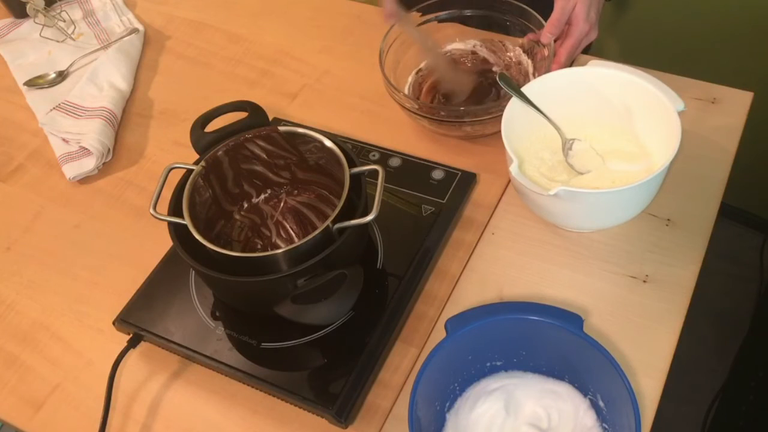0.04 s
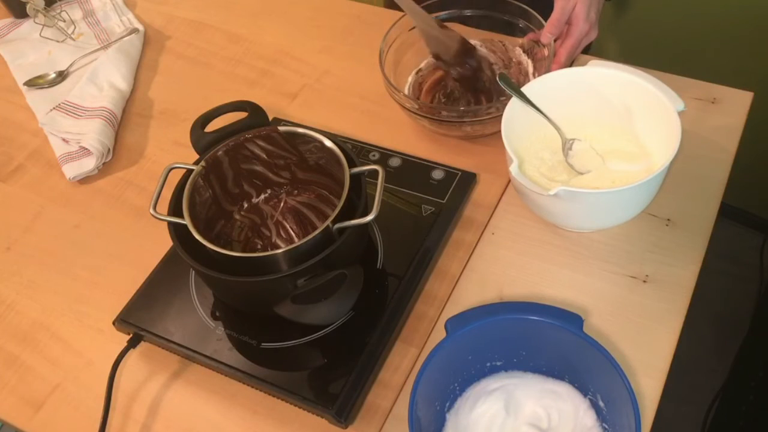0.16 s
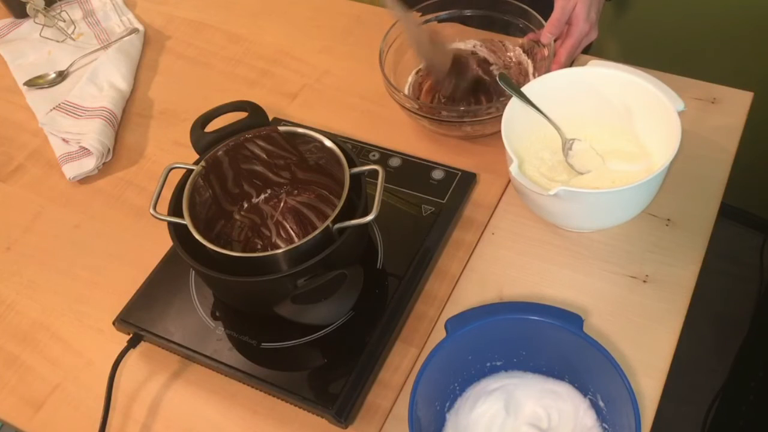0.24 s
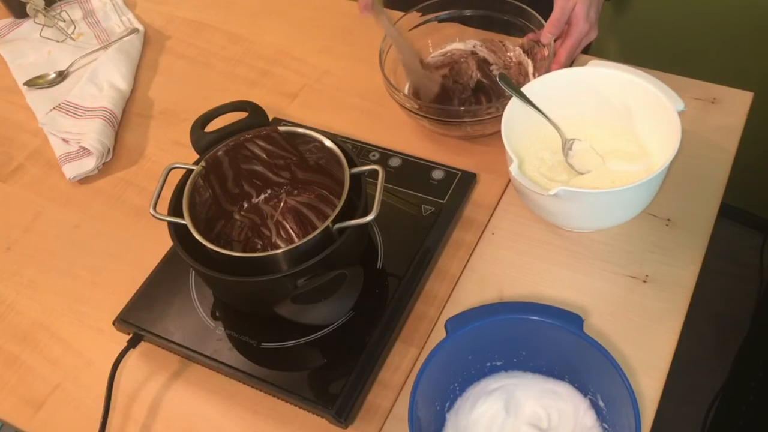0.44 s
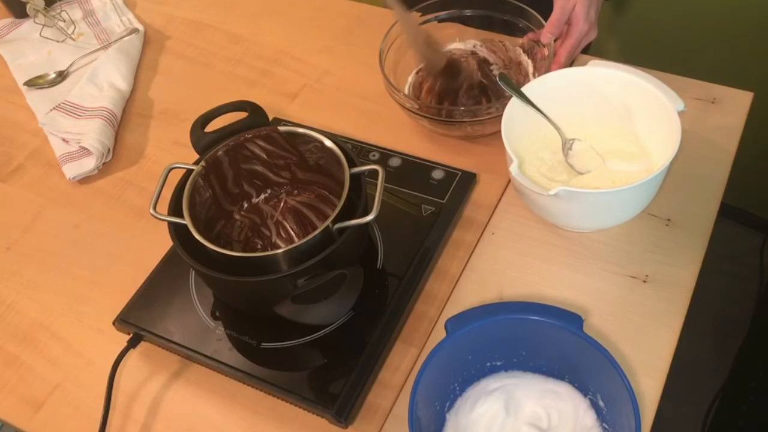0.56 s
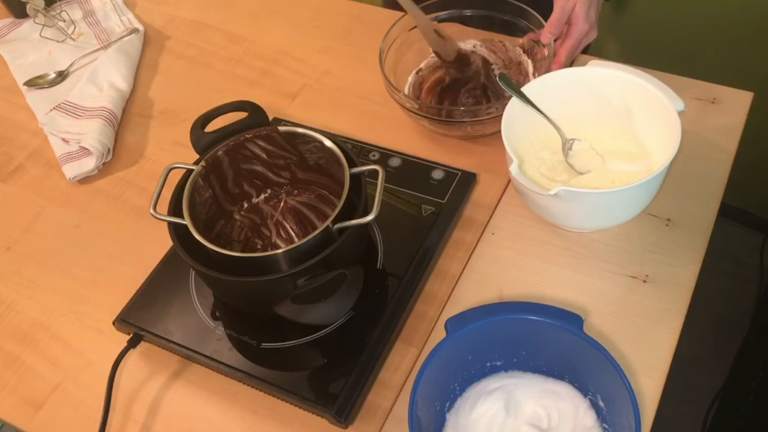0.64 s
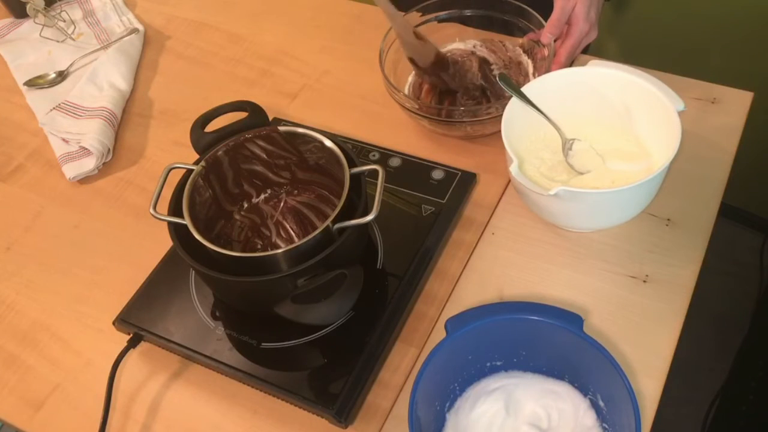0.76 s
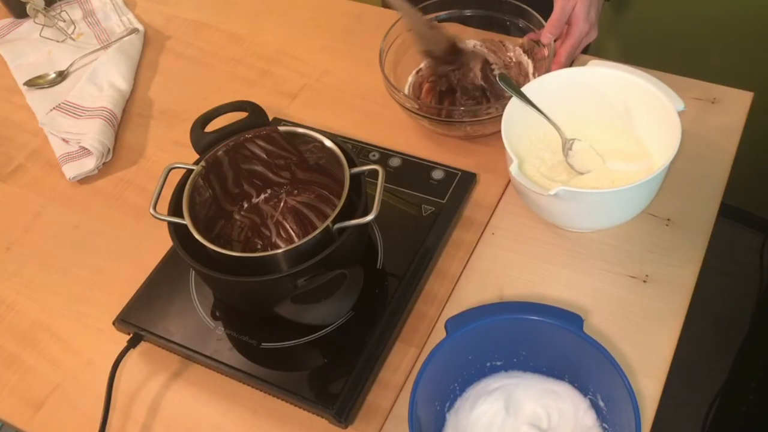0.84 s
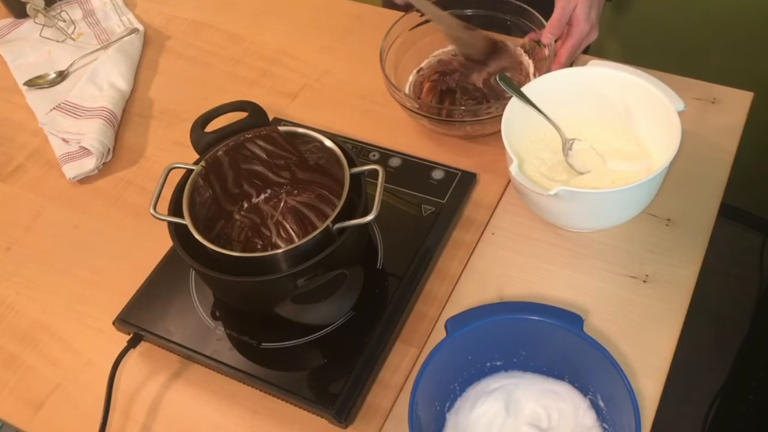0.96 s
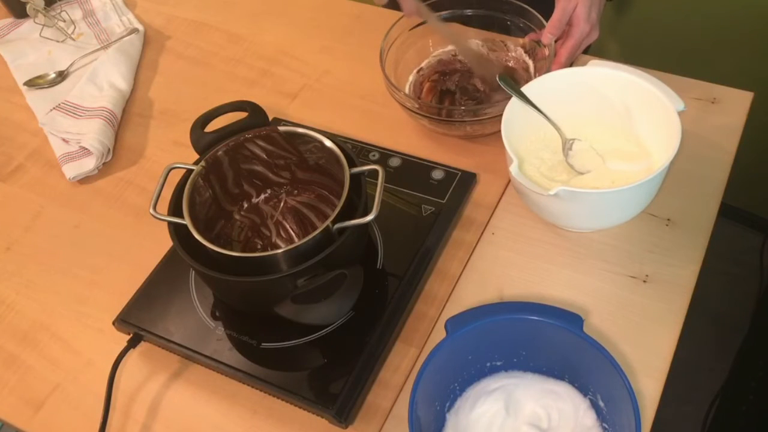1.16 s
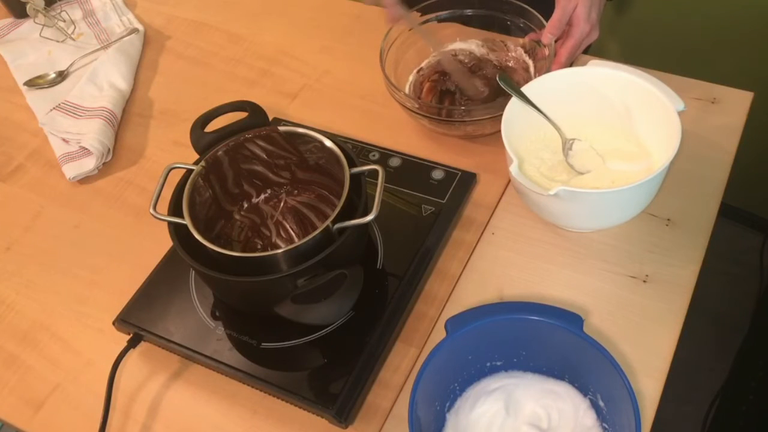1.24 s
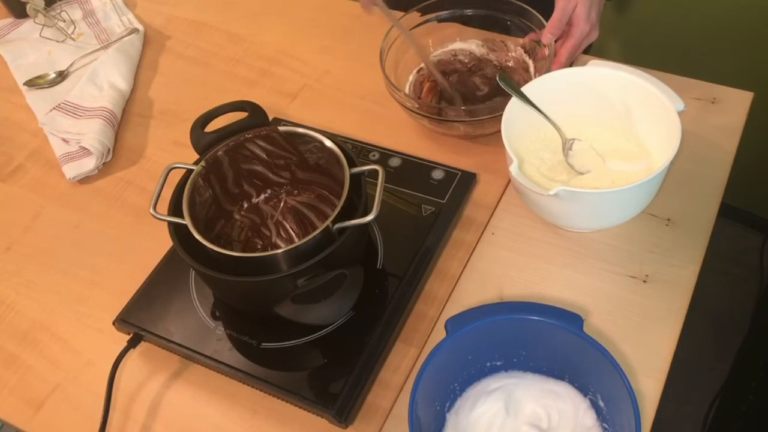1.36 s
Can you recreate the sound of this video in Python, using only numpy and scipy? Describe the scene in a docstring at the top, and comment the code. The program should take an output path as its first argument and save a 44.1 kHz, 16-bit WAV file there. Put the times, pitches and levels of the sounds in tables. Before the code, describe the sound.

A spatula stirs a thick mixture in a glass bowl: a hard knock, a ringing clink, a brief scrape, a light tap and a dull plop. Small wet smacks come between them, over a faint kitchen hum.

```python
"""A spatula works a thick, airy mixture in a glass bowl on a wooden kitchen counter.
Over a small room's rumble and hum, the foam fizzes quietly and smacks as it parts from the glass.
The spatula knocks hard, clinks the bare glass, slides briefly along the wall, taps lightly
and ends on a dull plop. Each blow shakes the counter, rings the bowl and echoes in the kitchen."""
import sys
import numpy as np
from scipy import signal
from scipy.fft import rfft, irfft
from scipy.io import wavfile

SR = 44100
rng = np.random.default_rng(int(sys.argv[2]) if len(sys.argv) > 2 else 0)


def store_pcm(level_fs):
    """Save levels as 16-bit WAV."""
    pcm = np.round(np.clip(level_fs, -1, 1) * 32767).astype(np.int16)
    wavfile.write(sys.argv[1], SR, np.atleast_2d(pcm).T)


N = 61739
T = np.arange(N) / SR

# the wet sparkle of smacks and bubbles: pitch_hz, width_hz, level_db
WET_TREBLE = [(9050, 6000, -7), (12400, 2600, -0.5), (15000, 2000, -9)]


def amp(db):
    """Decibels to gain."""
    return 10 ** (np.asarray(db) / 20)


def unit(x):
    """Scale to rms 1."""
    return x / np.sqrt(np.mean(x ** 2) + 1e-20)


def at_hz(rows, hz, column=1):
    """Read a column of a table on a log-frequency axis."""
    rows = np.array(rows)
    return np.interp(np.log(hz), np.log(rows[:, 0]), rows[:, column])


def delayed(x, start_s):
    """The sound x, starting at start_s."""
    return np.concatenate([np.zeros(max(int(start_s * SR), 0)), x, np.zeros(N)])[:N]


def through(x, response):
    """Pass a sound through an impulse response."""
    return signal.fftconvolve(x, response)[:N]


def damped(resonances):
    """A click through parallel resonances, each applied twice: a brief swell and a fast decay."""
    out = np.zeros(N)
    for k, (hz, width_hz, db) in enumerate(resonances):
        rate = np.pi * width_hz
        envelope = 2 * rate ** 2 / SR * T * np.exp(-rate * T)
        out += (-1) ** k * amp(db) * envelope * np.sin(2 * np.pi * hz * T)
    return out


def ring(modes):
    """Struck modes, each a dying sine."""
    return sum(amp(db - 60 * T / t60_s) * np.sin(2 * np.pi * hz * T) for hz, db, t60_s in modes)


def room_tone():
    """A bed of low rumble, soft hiss, mains hum and the faint whine of an appliance."""
    # colour of the rumble and hiss: frequency_hz, relative_db
    air_spectrum = [(20, 1), (48, 0.5), (78, -10), (105, -13.5), (135, -20), (290, -20.5), (600, -30),
                    (1100, -28), (1700, -25.5), (2800, -28.5), (4200, -36.5), (7000, -39), (15000, -38.5)]
    # steady tones of the mains and the appliance: pitch_hz, level_db
    hum_tones = [(50, -63), (100, -72.5), (1756, -79.5)]
    hz = np.maximum(np.arange(N // 2 + 1) * SR / N, 1)
    air = irfft(rfft(rng.standard_normal(N)) * amp(at_hz(air_spectrum, hz)), N)
    hum = sum(amp(db) * unit(np.sin(2 * np.pi * pitch_hz * T)) for pitch_hz, db in hum_tones)
    return amp(db=-58.5) * unit(air) + hum


def fizz():
    """Tiny bubbles burst at random while the foam is folded."""
    # rise and fall of the fizz: time_s, level_db
    level_curve = [(0, -72.5), (.15, -85), (.33, -73.5), (.5, -77.5), (.62, -74), (.68, -67), (.85, -72),
                   (1.03, -70), (1.15, -79), (1.27, -74.5), (1.39, -69.5)]
    bursts_per_s, spread_db = 2300, 4
    sizes = amp(spread_db * np.minimum(rng.exponential(1, N), 5)) * rng.choice([-1, 1], N)
    bursts = sizes * (rng.random(N) < bursts_per_s / SR)
    envelope = amp(np.interp(T, *np.transpose(level_curve)))
    return envelope * unit(through(bursts, damped(WET_TREBLE)))


def smacks(room):
    """A film of mixture snaps off the glass: a short spray of clicks that rings a small air pocket."""
    # the wet smacks: start_s, treble_db, pocket_db, pocket_hz
    snaps = [(0.0226, -29, -27.5, 4240), (0.1954, -23.5, -22, 4650), (0.2034, -6.5, -25, 4000),
             (0.2048, -11, 2.5, 2180), (0.2096, -11, -9, 4800), (0.3158, -14, -27.5, 4470),
             (0.3201, -22.5, -44, 4300), (.3845, -30.5, -49, 4290), (.3925, -29, -41, 4340),
             (0.543, -34, -34, 4300), (.6406, -14.5, -15, 4380), (0.6446, -26, -27, 4300),
             (.6527, -16, -24, 4020), (0.6929, -46, -26, 2680), (0.7258, -26, -28.5, 3700),
             (.7715, -32.5, -34, 4340), (.8095, -32.5, -41.5, 4300), (.9055, -29.5, -45, 4510),
             (1.0024, -28.5, -49.5, 4300), (1.0498, -24, -30, 3300), (1.0962, -33, -27.5, 4080),
             (1.3172, -26.5, -50, 4370), (1.3439, -42, -22.5, 2800), (1.3725, -24.5, -34.5, 4330),
             (1.393, -29, -48, 4300)]
    spray_samples, spray_decay_s, first_click, pocket_width_hz = 512, 0.00064, .35, 1400
    treble, out = damped(WET_TREBLE), np.zeros(N)
    for start_s, treble_db, pocket_db, pocket_hz in snaps:
        spray = rng.standard_normal(spray_samples) * np.exp(-T[:spray_samples] / spray_decay_s)
        spray = spray / np.linalg.norm(spray) + first_click * signal.unit_impulse(spray_samples)
        colour = amp(treble_db) * treble + damped([(pocket_hz, pocket_width_hz, pocket_db)])
        out += delayed(np.convolve(spray, colour[:spray_samples]), start_s)
    return out + amp(db=3.5) * through(out, room)


def kitchen_echo():
    """The room's impulse response: half-octave bands of noise, each dying at its own rate."""
    # colour and length of the tail: frequency_hz, level_db, t60_s
    tail = [(80, 9, .4), (232, -4.5, 0.39), (600, -6, 0.28), (1150, -7.5, 0.21), (2500, -19, 0.2),
            (5000, -11.5, 0.15), (12000, -18.5, .22)]
    predelay_s, build_s = .003, .004
    hz = np.arange(N // 2 + 1) * SR / N
    white, out = rfft(rng.standard_normal(N)), np.zeros(N)
    edges_hz = 45 * 2 ** (np.arange(18) / 2)
    for low, high in zip(edges_hz, edges_hz[1:]):
        centre_hz = np.sqrt(low * high)
        t60_s = at_hz(tail, centre_hz, column=2)
        band = irfft(white * ((hz >= low) & (hz < high)), N)
        band *= amp(-60 * T / t60_s) * (1 - np.exp(-T / build_s))
        out += amp(at_hz(tail, centre_hz)) * unit(band) * np.sqrt(2 * (high - low) / SR / N)
    return delayed(out, predelay_s)


def bending_waves(x):
    """Waves cross the bowl at a speed that grows with the square root of pitch: the lows arrive last."""
    crossing_s, reference_hz = .0013, 976  # travel time at this pitch
    hz = np.arange(N + 1) * SR / (2 * N)
    phase_lag = 4 * np.pi * crossing_s * np.sqrt(reference_hz * hz)
    return irfft(rfft(x, 2 * N) * np.exp(-1j * phase_lag))[:N]


def counter_thud(level_db, tilt_db_per_octave):
    """The wooden counter takes up a blow through the bowl and booms in its low modes."""
    # modes of the counter: pitch_hz, level_db, t60_s
    wood_modes = [(73, -43, .52), (125, -42, .38), (153, -43, .32), (220, -37, .36), (272, -43, .45),
                  (406, -39, .32)]
    pivot_hz, rise_s = 130, 0.0022
    tilted = [(hz, db + level_db + tilt_db_per_octave * np.log2(hz / pivot_hz), t60_s)
              for hz, db, t60_s in wood_modes]
    return ring(tilted) * (1 - np.exp(-T / rise_s))


def spatula_blows(room):
    """Each blow is a damped contact that rebounds at once, with its echo, a thud and a glassy ring."""
    # knock, clink, tap and plop, a row each: start_s, contact_db, thud_db, thud_tilt_db_per_octave,
    # glass_db, echo_send_db, rebound_after_s, rebound_db
    blows = [(0.2081, 1, -2.5, -5.5, -24, -0.5, 0.00062, -13.5),
             (0.5538, -2, 1, 0.5, 1.5, 5.5, 0.001042, -10.5),
             (1.0098, -2, -19.5, -7, -20.5, 0.5, 0.001176, -11),
             (1.3566, -2, -27.5, -5, -33, 0.5, 0.0012, -10)]
    # damped resonances of each kind of contact: pitch_hz, width_hz, level_db
    hard_knock = [(120.8, 130, 7.5), (319.6, 200, 8), (668, 220, 18.5), (905, 340, 6), (1018, 170, 17.5),
                  (1480, 500, 14), (2070, 370, 19.5), (2623, 494, 19.5)]
    bare_clink = [(195.3, 160, 5.5), (494, 310, 8.5), (860, 200, 2.5), (1213, 154, 8.5), (1810, 470, 10),
                  (3100, 440, 3.5), (4000, 900, -10.5), (5090, 610, -2.5), (6300, 800, -32),
                  (7700, 670, -6.5), (9100, 3500, -22.5), (11800, 2700, -21)]
    light_tap = [(124, 180, -5), (508, 430, 0.5), (1260, 260, 3.5), (2038, 630, 1.5), (3110, 650, -4),
                 (4630, 900, -16), (5840, 310, -8), (6800, 640, -8.5), (7820, 260, -3), (9550, 900, -5.5),
                 (12450, 280, -6), (15100, 1800, -8)]
    dull_plop = [(517, 307, 4.5), (1116, 350, -8.5)]
    # free ring of the bowl, its lowest mode a close pair: pitch_hz, level_db, t60_s
    glass_modes = [(1016, -51, .64), (1021, -43, .16), (1292, -46, .15), (1529, -59, .4), (1848, -48, .42),
                   (1868, -50, .14), (2035, -45, .15), (3966, -47, .16), (4169, -53, .15), (5231, -45, .17),
                   (6595, -59, .25), (6618, -63, .12), (7573, -60, .14), (8088, -60, .11), (9692, -57, .14),
                   (13200, -63, .12)]
    widening = 1.3  # the room hears the bowl from all sides, which broadens its resonances
    glass, out = ring(glass_modes), np.zeros(N)
    for blow, resonances in zip(blows, (hard_knock, bare_clink, light_tap, dull_plop)):
        start_s, contact_db, thud_db, tilt, glass_db, send_db, rebound_s, rebound_db = blow
        contact = amp(contact_db) * bending_waves(damped(resonances))
        rebound = -amp(rebound_db) * delayed(contact, rebound_s)
        broadened = damped([(hz, width_hz * widening, db) for hz, width_hz, db in resonances])
        echo = amp(contact_db + send_db) * through(broadened, room)
        thud = counter_thud(thud_db, tilt)
        out += delayed(contact + rebound + echo + thud + amp(glass_db) * glass, start_s)
    return out


def scrape():
    """The blade slides along the coated glass in a soft swell of tiny slips."""
    # resonances of the blade on the wall: pitch_hz, width_hz, level_db
    blade_resonances = [(1480, 700, -1), (2090, 500, -4), (2660, 1800, -13)]
    peak_s, half_length_s, slips_per_s = 0.734, 0.04, 1500
    slips = rng.standard_normal(N) * (rng.random(N) < slips_per_s / SR)
    swell = np.exp(-((T - peak_s) / half_length_s) ** 2)
    return amp(db=-64) * swell * unit(through(slips, damped(blade_resonances)))


def scene():
    """Bowl, mixture and room, mixed in mono."""
    room = kitchen_echo()
    return (spatula_blows(room) + smacks(room) + fizz() + room_tone() + scrape())[None]


def record(dry):
    """A steep low-pass takes off the very top."""
    cutoff_hz = 16000
    return signal.sosfilt(signal.ellip(10, .2, 70, cutoff_hz, fs=SR, output="sos"), dry)


dry = scene()
out = record(dry)
store_pcm(out)
```